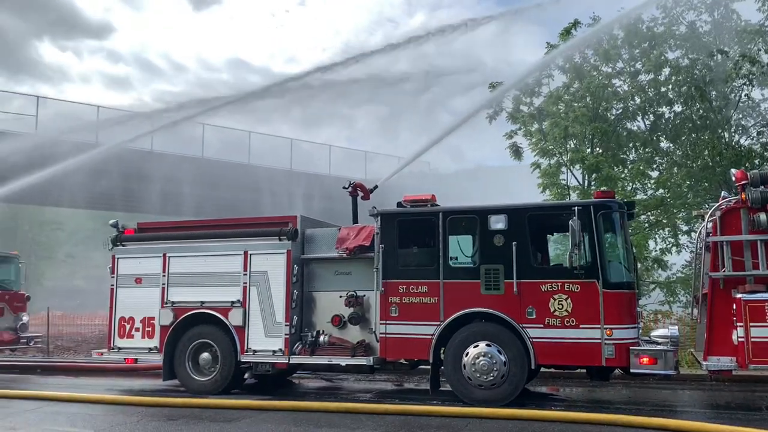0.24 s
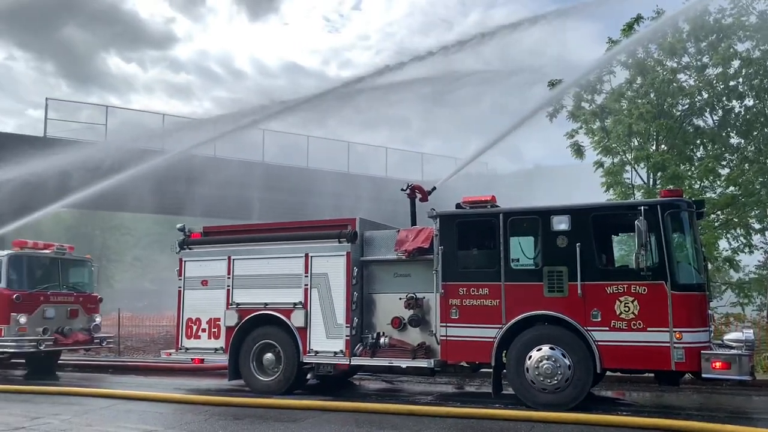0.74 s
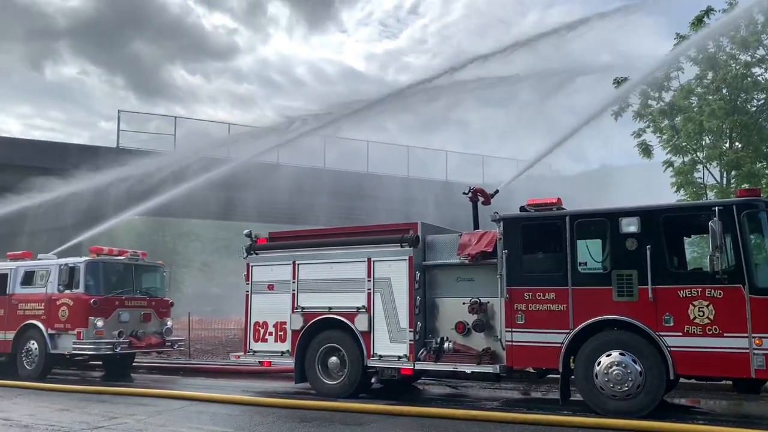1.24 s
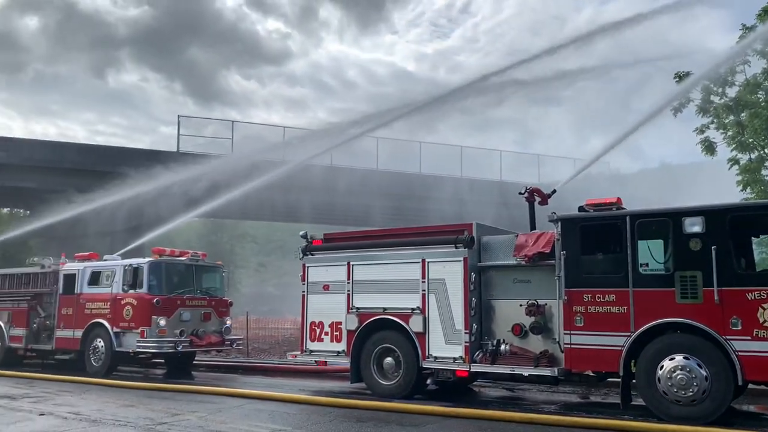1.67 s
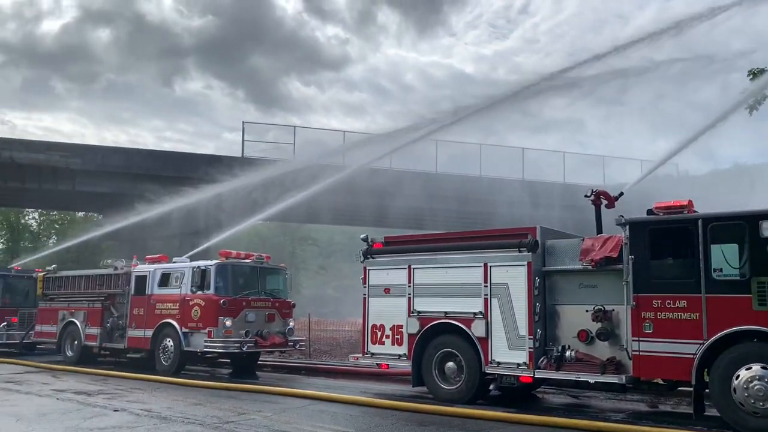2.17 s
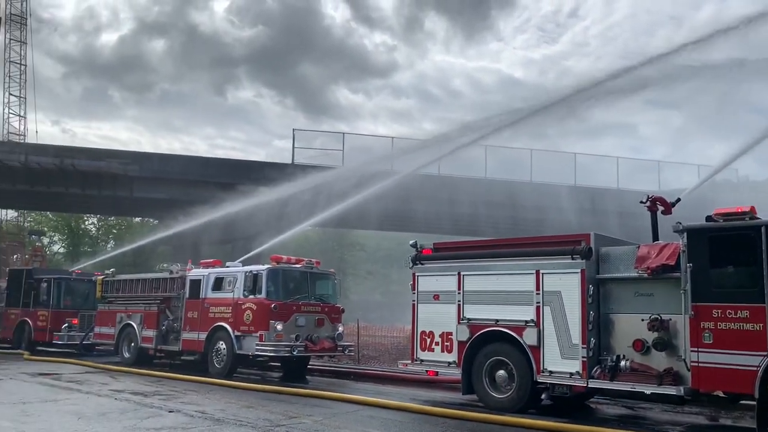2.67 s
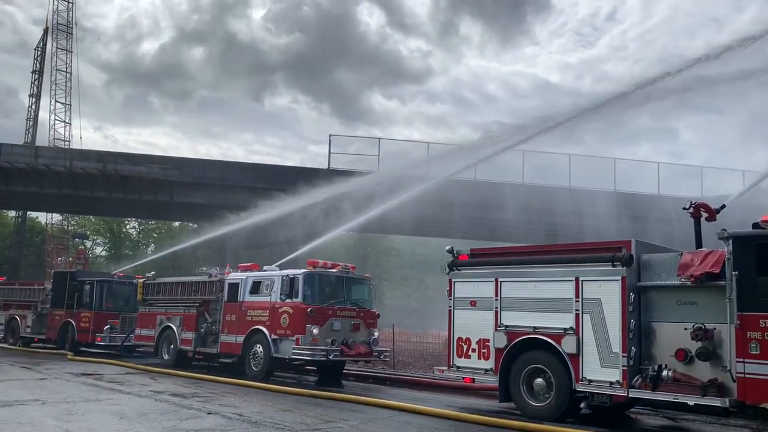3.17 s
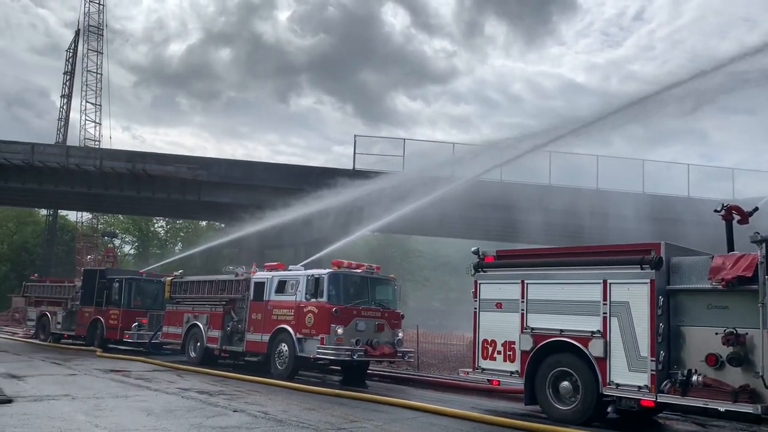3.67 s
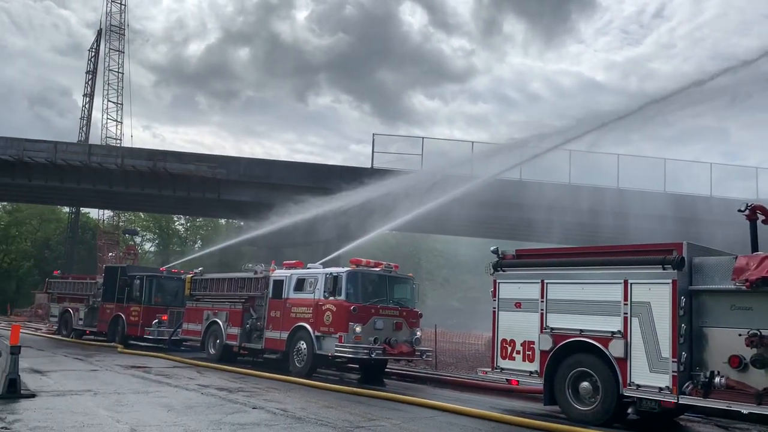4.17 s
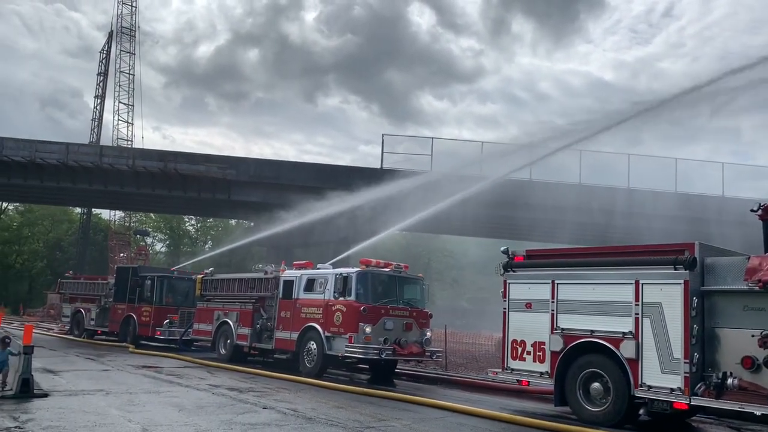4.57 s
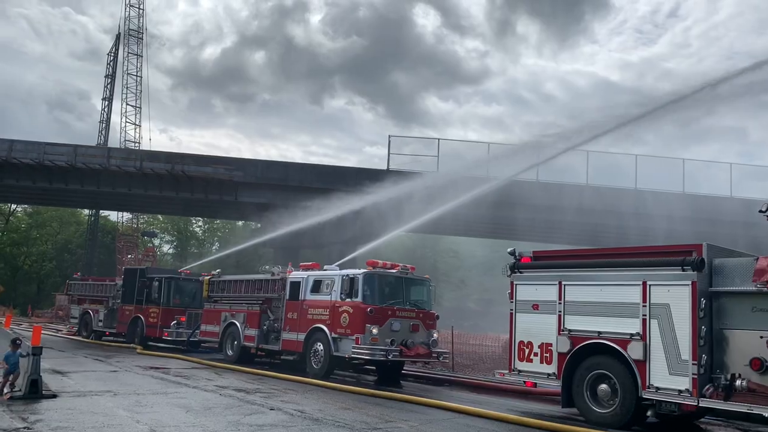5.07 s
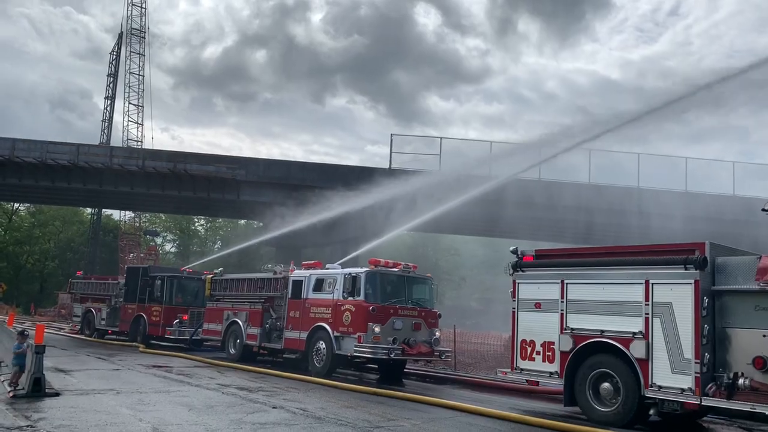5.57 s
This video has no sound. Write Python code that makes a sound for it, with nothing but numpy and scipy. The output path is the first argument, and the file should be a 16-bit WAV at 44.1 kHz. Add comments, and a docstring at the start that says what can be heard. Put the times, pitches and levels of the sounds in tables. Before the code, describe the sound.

Outdoors on a wet road, several fire engines run their pumps throughout. The nearest diesel gives a constant, rough low drone of fast uneven exhaust pulses, its pitch almost fixed; farther engines add steady hums and low rumble. A midrange pump-gear whine rides on top, its upper overtones brighter at about 2 to 3 seconds. A thin, fluttering high turbo whine dips near 2 and 4.7 seconds, then is strongest from about 5.2 to 5.6 before easing. Water jets and fans make a coloured hiss with airy spray, narrow whistling resonances and dense fine metallic rattling. Midrange roar surges briefly around 3 seconds and stays fuller afterwards. Very faint short tones flicker within it. The whole mass climbs smoothly, roughly ten decibels by 5.8 seconds, and ends still running. The stereo is modestly wide, with a solid low end and diffuse hiss, as from a small handheld device.

```python
"""On a wet road, fire engines pump water and everything but brief faint tones slowly grows louder.
The nearest diesel excites its exhaust resonances with uneven pulses; farther engines hum as steady sines.
A pump gear and a turbocharger whine as wavering harmonics and sidebands. Jets and fans hiss and spray as
coloured noise, narrow resonances whistle, and panels rattle as decaying modes struck at random.
Two microphone ports hear tones with a phase lag and diffuse sounds with partial coherence."""
import sys
import numpy as np
from scipy import signal
from scipy.fft import rfft, irfft, next_fast_len
from scipy.io import wavfile

SR = 44100
rng = np.random.default_rng(int(sys.argv[2]) if len(sys.argv) > 2 else 0)


def transcribe(signal):
    """Save signal, clipped to [-1, 1], as a 16-bit WAV file at the path in sys.argv[1]."""
    frames = np.atleast_2d(signal).T
    limited = np.clip(frames, -1, 1)
    pcm = np.round(limited * 32767).astype(np.int16)
    wavfile.write(sys.argv[1], SR, pcm)


N = 257103
T = np.arange(N) / SR   # s


def amp(db):
    """Level definition: 20 dB is a tenfold amplitude."""
    return 10 ** (np.asarray(db) / 20)


def in_time(rows):
    """Linear interpolation over time: each column as one value a sample."""
    s, *columns = np.transpose(rows)
    return [np.interp(T, s, column) for column in columns]


def at_hz(rows, hz):
    """Interpolation along logarithmic frequency: each column at the given frequencies."""
    f, *columns = np.transpose(rows)
    return [np.interp(np.log(hz + 1), np.log(f), column) for column in columns]


def drift(rate):
    """Low-pass random process: two equal poles with a corner at rate (Hz), scaled to spread 1."""
    step = 40   # samples between random draws
    r = np.exp(-2 * np.pi * rate * step / SR)
    warm_up = 2000
    chance = rng.standard_normal(N // step + 2 + warm_up)
    slow = signal.lfilter([1], [1, -2 * r, r * r], chance)[warm_up:]
    return np.interp(np.arange(N) / step, np.arange(len(slow)), slow / slow.std())


def resonate(x, modes):
    """Modal superposition: parallel two-pole resonances of alternating sign."""
    out = 0
    for k, (hz, width, db) in enumerate(modes):
        r = np.exp(-np.pi * width / SR)
        b = (1 - r * r) / 2 * np.array([1, 0, -1])
        a = [1, -2 * r * np.cos(2 * np.pi * hz / SR), r * r]
        out = out + (-1) ** k * amp(db) * signal.lfilter(b, a, x)
    return out


def tone(hz, level_db, lag, waver_db):
    """Phase difference between ports: a wavering sine whose left side lags by some radians."""
    phase = 2 * np.pi * (np.cumsum(hz + 0 * T) / SR + rng.random())
    side = np.array([[1], [-1]])
    level = amp(level_db + waver_db * drift(7.3))
    return np.sqrt(2) * level * np.sin(phase - lag / 2 * side)


# The two microphone ports: f/Hz, left lag/rad, likeness (0-1), left minus right level/dB
PORT_COHERENCE = [(30, .1, .9, 0), (200, .5, .9, 0), (450, 1.2, .75, 0), (650, 1.5, .3, .5),
                  (800, -1, .3, -1), (1200, -2.9, .6, -.5), (1800, -2.5, .3, -1), (2500, -1, .3, -2),
                  (3500, .7, .35, -2), (5300, -2.5, .2, -4), (6200, 0, .5, -1), (8500, 3.14, .97, 0),
                  (10900, 6.28, .9, 0), (13400, 9.42, .97, 0), (15700, 12.57, .9, 0)]


def at_ports(sound):
    """Partial coherence: of three unrelated noises one is shared with a lag, one belongs to each port."""
    size = next_fast_len(N)
    hz = np.arange(size // 2 + 1) * SR / size
    lag, alike, balance_db = at_hz(PORT_COHERENCE, hz)
    alike = np.clip(alike, 0, 1)
    shared, left, right = rfft(sound, size)
    side = np.array([[1], [-1]])
    common = np.sqrt(alike) * shared * np.exp(-.5j * lag * side)
    own = np.sqrt(1 - alike) * np.array([left, right])
    return hz, size, (common + own) * amp(balance_db * side / 2)


def port_noise(spectrum, patchy_db, flicker_db):
    """Band-filtered noise: each third of an octave wavers slowly and quickly on its own."""
    hz, size, both = at_ports(rng.standard_normal((3, N)))
    both = both * amp(at_hz(spectrum, hz)[0]) * np.sqrt(SR / 2)
    band = 3 * np.log2(hz + 1)
    first, last = [int(3 * np.log2(spectrum[end][0])) for end in (0, -1)]
    out = 0
    for centre in range(first, last + 2):
        share = np.cos(np.pi / 2 * np.clip(band - centre, -1, 1))   # neighbours overlap at equal power
        level = amp(patchy_db * drift(0.68) + flicker_db * drift(17.0))
        out = out + level * irfft(both * share, size)[:, :N]
    return out


# The near engine's cycles per second, and its governor's slow hunting
CYCLE_HZ, HUNT_HZ, HUNT_PERIOD_S, HUNT_START_S = 14.9992, .0084, 5.1, .55


def speed():
    """Governor hunting: the cycle rate swings sinusoidally, a little fast at the start, then slow, then fast."""
    return CYCLE_HZ - HUNT_HZ * np.sin(2 * np.pi * (T - HUNT_START_S) / HUNT_PERIOD_S)


# Exhaust pulses of one engine cycle: place in the cycle (0-1), relative strength level/dB
EXHAUST_PULSES = [(-.0165, 1.5), (.1683, -7.4), (.2476, -8), (.4081, -4.7), (.4976, -4.5), (.6175, -.1),
                  (.6989, -2.1)]
FIRING_SPREAD_DB, FIRING_JITTER_S = .3, .00002
ENGINE_LAG_S = 0.00047   # left port after right


def firings(lead):
    """Impulsive excitation: uneven pulses, each a little different, begin lead samples early."""
    turns = np.cumsum(speed()) / SR
    place, strength_db = np.transpose(EXHAUST_PULSES)
    due = (np.arange(-7, int(turns[-1]) + 2)[:, None] + place).ravel()   # in cycles
    chance = rng.standard_normal((len(due), 2))
    when = np.where(due < 0, due / CYCLE_HZ, np.interp(due, turns, T, right=np.inf))
    when = when + FIRING_JITTER_S * chance[:, 0]
    pulse_db = np.resize(strength_db, len(due)) + FIRING_SPREAD_DB * chance[:, 1]
    size = amp(pulse_db) * SR / (2 * CYCLE_HZ)
    clicks = np.zeros((2, N + lead))
    for side, lag in enumerate((ENGINE_LAG_S / 2, -ENGINE_LAG_S / 2)):
        at = (when + lag) * SR + lead
        ok = at < N + lead - 2
        whole, part = at[ok].astype(int), at[ok] % 1   # a pulse between two samples is shared
        clicks[side, whole] += size[ok] * (1 - part)
        clicks[side, whole + 1] += size[ok] * part
    return clicks


# Exhaust pipe resonances of alternating sign, close pairs partly cancel: f/Hz, width/Hz, relative level/dB
PIPE_MODES = [(58.8, 1.5, -30.2), (128.6, 4, -27.4), (179.7, 8, -22.6), (207.2, 12.6, -32.9),
              (254.2, 10.2, -43.8), (261, 30, -45.6), (311, 24.5, -27.3), (314.7, 30, -29.9),
              (366.3, 26.4, -23.8), (366, 30, -24.4), (406.6, 4, -38.3), (442.8, 4, -33.5), (480.7, 4, -44)]
# Upper orders radiated by the engine block: multiple of the cycle rate,
# rms level at the start/dB re the swell, gain/(dB per s)
BLOCK_ORDERS = [(31, -35, .5), (32, -38, .5), (34, -38, 0), (35, -35, 0), (36, -35, 1.5), (39, -45, 1),
                (41, -40, 1), (42, -42, 1.3), (48, -45, .5), (58, -44, 0), (60, -45, 0)]


def diesel():
    """Source-filter principle: firings ring the pipes; the block adds harmonics of the cycle."""
    lead = SR // 2   # the pipes already ring at the start
    cycle_hz = speed()
    exhaust = amp(20.5) * resonate(firings(lead), PIPE_MODES)[:, lead:]
    block = 0
    for k, db, gain_db in BLOCK_ORDERS:
        lag = 2 * np.pi * k * cycle_hz * ENGINE_LAG_S
        block = block + tone(k * cycle_hz, db + gain_db * T, lag=lag, waver_db=2.5)
    return exhaust + block


# Low orders of the farther engines: f/Hz, rms level/dB re the swell
FAR_ORDERS = [(35, -30), (46.8, -40), (52.8, -31), (58.5, -36), (65, -26), (76.3, -28), (79.2, -28),
              (84.6, -30), (97.5, -33), (116.8, -35), (130, -29), (140, -33), (207.3, -31), (321, -21),
              (354.4, -30), (495, -41)]


def far_engines():
    """Additive synthesis: steady-pitched engine orders, their port lag growing with frequency."""
    return sum(tone(hz, db, lag=.25 + hz / 600, waver_db=1.0) for hz, db in FAR_ORDERS)


GEAR_HZ = 888.2   # mean tooth-mesh rate
# Harmonics of the tooth mesh: multiple, left lag/rad, rms level at the start/dB re the swell,
# gain/(dB per s)
MESH_ORDERS = [(1, 0.4, -31.5, .5), (2, -1.7, -59, 3.5), (3, -2.5, -47.5, 1.5), (4, 1.5, -42.5, .5)]
# Coming and going of the third and fourth orders: t/s, added level/dB
UPPER_MESH_LEVEL = [(0, -5), (1.6, -3), (1.9, 5), (3.1, -2), (3.6, 1), (5.3, 0.5), (5.6, -7), (5.83, -5)]


def pump_gear():
    """Harmonic series of tooth mesh: all orders share one drifting pitch, the higher ones waver more."""
    hz = GEAR_HZ + 0.51 * drift(7.0)
    upper_db, = in_time(UPPER_MESH_LEVEL)
    out = 0
    for k, lag, db, gain_db in MESH_ORDERS:
        order_db = db + gain_db * T + upper_db * (k > 2)
        out = out + tone(k * hz, order_db, lag=lag, waver_db=.7 * k)
    return out


TURBO_HZ, SHAFT_HZ = 6447, 35.0             # mean whine pitch and the spacing of its side tones
FLUTTER_HZ, FLUTTER_DB = 11.7, 2.0          # the main whine flutters with its engine's cycle
SIDES_DB, SIDES_FOLLOW = -33.5, .3   # side tones keep near this level, following a share of the swings
# Strength of the whine: t/s, level/dB re the swell
WHINE_LEVEL = [(0, -36.5), (1.1, -38), (1.95, -51), (2.27, -38), (3.7, -39.5), (4.5, -37), (4.72, -55),
               (5.18, -34), (5.57, -32), (5.83, -42)]
# Main whine and its sidebands: multiple of the shaft rate, added level/dB
WHINE_SIDEBANDS = [(-3, -17), (-2, -8), (-1, -5), (0, 2.5), (1, -11), (2, -14), (3, -18)]


def turbo():
    """Modulation sidebands: a fluttering whine with side tones a shaft turn apart."""
    level_db, = in_time(WHINE_LEVEL)
    sides_db = SIDES_DB + SIDES_FOLLOW * (level_db - SIDES_DB)
    hz = TURBO_HZ + 2.99 * drift(21.8)
    main_db = level_db + FLUTTER_DB * np.sin(2 * np.pi * (FLUTTER_HZ * T + rng.random()))
    out = 0
    for k, db in WHINE_SIDEBANDS:
        tone_db = (sides_db if k else main_db) + db
        out = out + tone(hz + k * SHAFT_HZ, tone_db, lag=.2 - 0.61 * k, waver_db=2.2 * np.sqrt(abs(k)))
    return out


# Relative spectral density of the hiss: f/Hz, level/dB per Hz
HISS_SPECTRUM = [(700, -48), (1000, -37), (1200, -33), (1400, -42), (1900, -41), (2400, -39), (3000, -38.5),
                 (3600, -46), (3800, -43), (4300, -43), (5500, -45.5), (6200, -48), (7000, -87)]


def hiss():
    """Broadband flow noise: jets and fans as coloured noise with wavering bands."""
    return port_noise(HISS_SPECTRUM, patchy_db=1.5, flicker_db=1.5)


# Housings and nozzles that the flow makes sing: f/Hz, width/Hz,
# level at the start/dB re the hiss gain, gain/(dB per s)
FLOW_RESONANCES = [(887, 67, -7, 1), (1097, 190, -4.5, -2), (1590, 360, -30, 3), (2129, 85, -14.5, 0.92),
                   (2374, 96, -17, 1.5), (2420, 33, -13.5, -0.44), (2657, 44, -15, 1), (2813, 45, -16.5, 0),
                   (3420, 310, -10, 0), (3680, 64, -21, 0), (5210, 44, -31.5, 2.5),
                   (6420, 120, -11.5, -0.5)]


def whistles():
    """Resonant selection: noise passes each narrow resonance twice and swells and fades at random."""
    white = rng.standard_normal((3, N))
    out = 0
    for hz, width, db, gain_db in FLOW_RESONANCES:
        mode = [(hz, width, 0)]
        sung = resonate(resonate(white, mode), mode)
        level = amp(db + gain_db * T + 1.04 * drift(0.43) + 1.8 * drift(7.5))
        out = out + level * sung / sung.std()
    hz, size, both = at_ports(out)
    return irfft(both, size)[:, :N]


def rattle(per_s, cycles):
    """Damped free vibration: random ticks ring panels and fittings, falling some 44 dB in cycles periods."""
    ticks = rng.exponential(1, (3, N))
    struck = rng.random((3, N)) < per_s / SR
    sizes = amp(2.6 * np.minimum(ticks, 4)) * struck
    dealt = rng.integers(0, 24, N)   # which pitch each tick rings
    rings = 0
    for k, hz in enumerate(np.geomspace(950, 4300, 24)):
        # the tiny offset keeps decaying filter states above the smallest numbers
        rings = rings + resonate(sizes * (dealt == k) + 1e-18, [(hz, 1.6 * hz / cycles, 0)])
    hz, size, both = at_ports(rings / rings.std())
    return irfft(both, size)[:, :N]


# Relative spectral density of the spray: f/Hz, level/dB per Hz
SPRAY_SPECTRUM = [(5500, -63), (6400, -40), (7500, -44), (8400, -42), (9400, -44), (10400, -39),
                  (11500, -46), (13300, -48), (15800, -50)]
SPRAY_DB, SPRAY_DB_PER_S = -28, 0.04   # re the swell at the start; it keeps almost level with the swell


def spray():
    """High-frequency broadband noise: spray as coloured noise with quickly flickering bands."""
    level = amp(SPRAY_DB + SPRAY_DB_PER_S * T)
    return level * port_noise(SPRAY_SPECTRUM, patchy_db=0.5, flicker_db=1.3)


# Relative spectral density of the roar: f/Hz, level/dB per Hz
ROAR_SPECTRUM = [(300, -32), (420, -34.5), (500, -31.5), (600, -28.5), (690, -30), (800, -34), (950, -33),
                 (1200, -43.5), (1600, -38), (2200, -59)]


def roar():
    """Mid-band broadband noise: coloured noise with strongly wavering bands."""
    return port_noise(ROAR_SPECTRUM, patchy_db=1.5, flicker_db=3.0)


# Spectral density of the rumble re the swell: f/Hz, level/dB per Hz
RUMBLE_SPECTRUM = [(20, -74), (40, -46), (60, -63), (75, -37), (110, -41), (160, -44.5), (205, -36),
                   (250, -43.5), (300, -41), (335, -49.5), (400, -45.5), (480, -54), (700, -68)]


def rumble():
    """Low-frequency broadband noise: coloured noise whose bands only flicker."""
    return port_noise(RUMBLE_SPECTRUM, patchy_db=0.0, flicker_db=1.0)


# Brief faint tones that stand out of the roar: centre t/s, f/Hz, length/s, rms level at the peak/dB
FAINT_TONES = [(.4, 602, 0.13, -52), (1.614, 1940, 0.09, -56.5), (1.858, 680, 0.05, -40),
               (2.06, 685, 0.054, -43.5), (3.006, 685, 0.065, -42), (3.38, 680, 0.056, -43),
               (4.313, 648, 0.16, -41.5), (4.54, 815, 0.095, -43.5), (4.79, 790, 0.14, -42),
               (5.1, 583, 0.11, -38.5), (5.65, 963, 0.036, -38)]


def flecks():
    """Windowed sines: short tones swell and fade under a squared-cosine envelope."""
    out = 0
    for s, hz, length, db in FAINT_TONES:
        shape = np.cos(np.pi * np.clip((T - s) / (2 * length), -.5, .5)) ** 2
        out = out + shape * tone(hz, db, lag=0.4, waver_db=2)
    return out


# Common loudness of all but the flecks: t/s, level/dB
COMMON_SWELL = [(0, -23), (.5, -22), (1.5, -20), (3.5, -17), (5, -15), (5.83, -13.5)]
# Roar and hiss: t/s, roar level/dB re the swell, hiss level/dB re the swell
FLOW_LEVELS = [(0, -24, -25.5), (.8, -24.5, -25.5), (1.4, -24, -25.5), (2.1, -22.5, -27), (2.9, -23, -27.5),
               (3.01, -18, -25.5), (3.1, -22, -26), (3.8, -19, -26.5), (4.5, -21.5, -27),
               (4.64, -20.5, -25.5), (4.75, -20.5, -26), (5.83, -19.5, -28)]
# Firing rhythm of a farther engine in the hiss: f/Hz, depth/dB
HISS_THROB = [(11.7, .5), (23.4, 0), (35.2, 0.4)]


def scene():
    """Linear superposition: sources add under a common swell; the flecks keep their own level."""
    level_db, = in_time(COMMON_SWELL)
    roar_db, hiss_db = in_time(FLOW_LEVELS)
    throb_db = sum(db * np.sin(2 * np.pi * (hz * T + rng.random())) for hz, db in HISS_THROB)
    lows = diesel() + far_engines() + rumble()
    whines = pump_gear() + turbo()
    wash = hiss() + whistles() + amp(-12.0) * rattle(per_s=420.0, cycles=81.0)
    wash = amp(hiss_db + throb_db) * wash
    swelling = lows + whines + wash + spray() + amp(roar_db) * roar()
    return amp(level_db) * swelling + flecks()


CUTOFF_HZ = 15750


def record(dry):
    """Band limiting: a high-pass cuts the lowest bass and a steep low-pass the top."""
    x = signal.sosfilt(signal.butter(2, 25, "high", fs=SR, output="sos"), dry)
    return signal.sosfilt(signal.ellip(12, .5, 70, CUTOFF_HZ, fs=SR, output="sos"), x)


dry = scene()
out = record(dry)
transcribe(out)
```